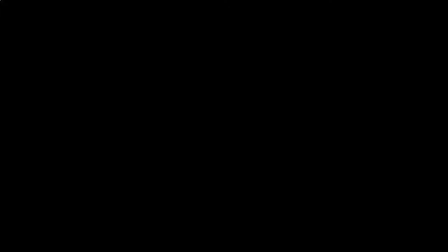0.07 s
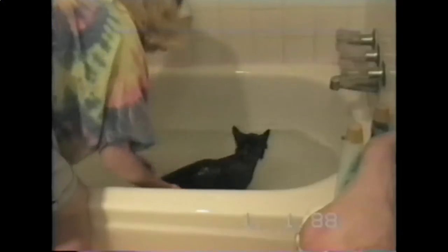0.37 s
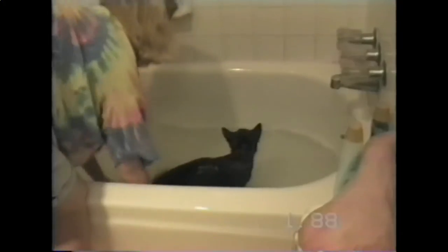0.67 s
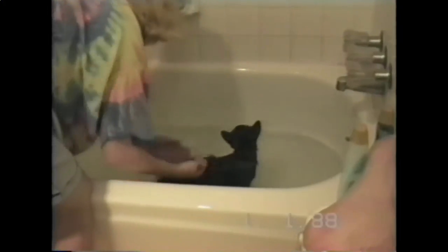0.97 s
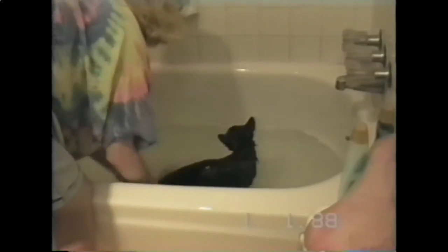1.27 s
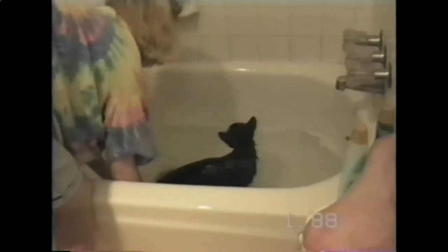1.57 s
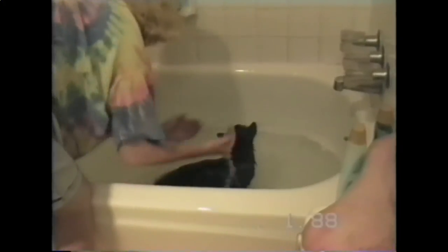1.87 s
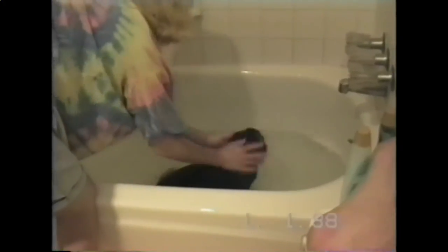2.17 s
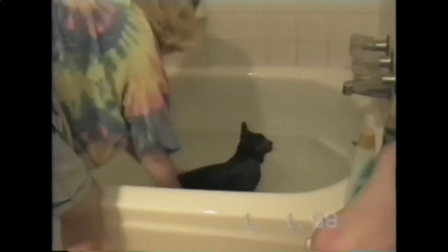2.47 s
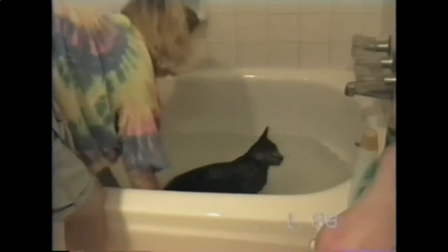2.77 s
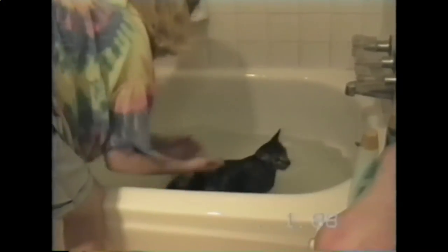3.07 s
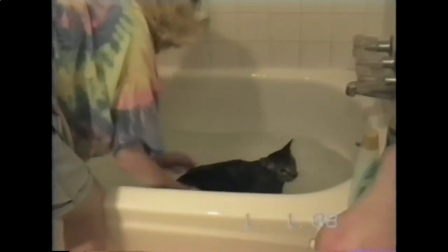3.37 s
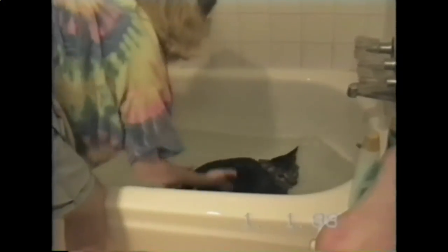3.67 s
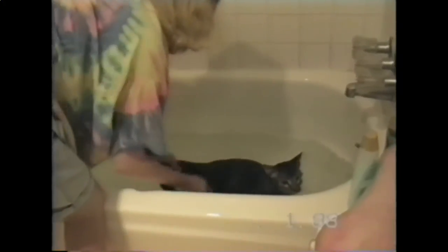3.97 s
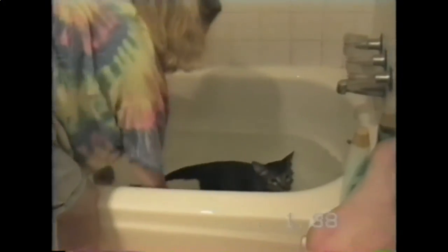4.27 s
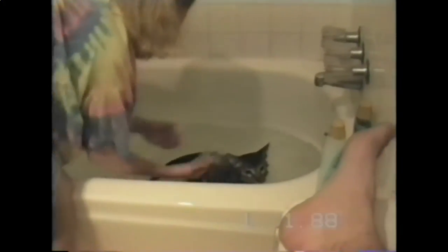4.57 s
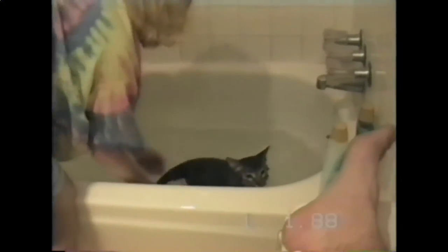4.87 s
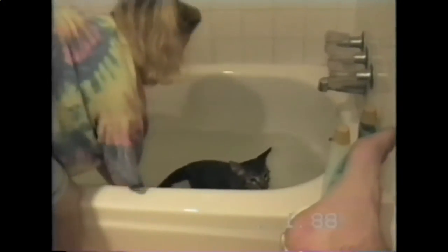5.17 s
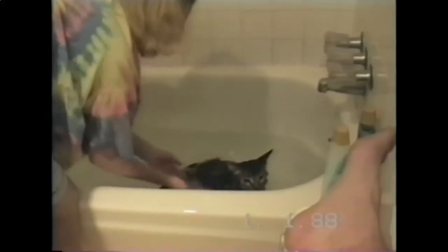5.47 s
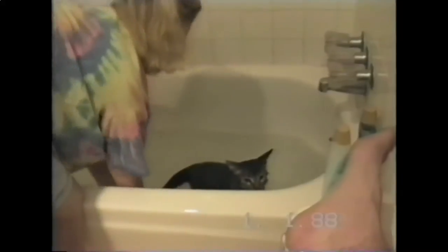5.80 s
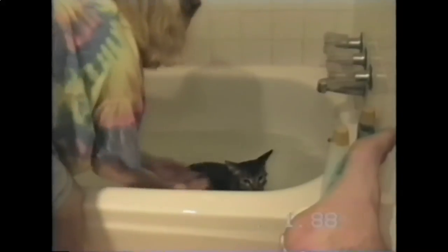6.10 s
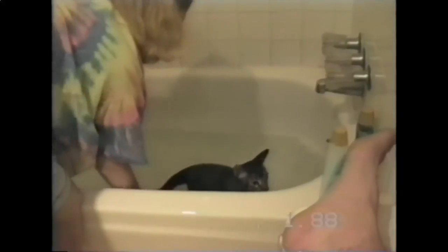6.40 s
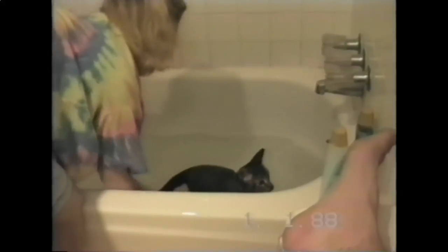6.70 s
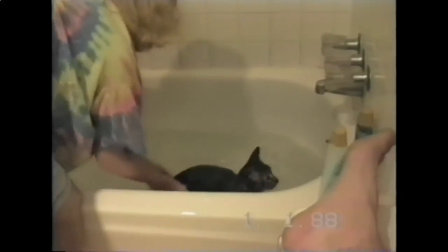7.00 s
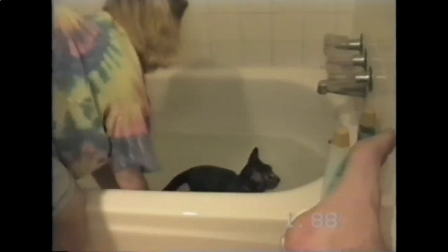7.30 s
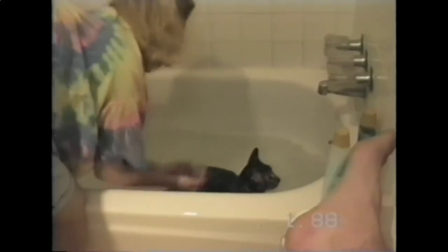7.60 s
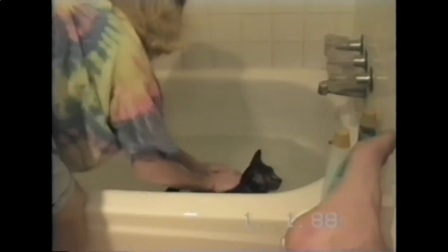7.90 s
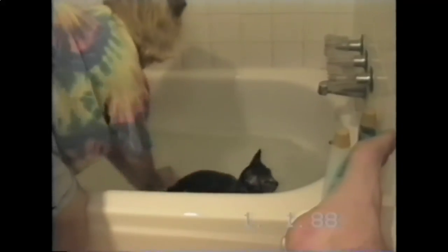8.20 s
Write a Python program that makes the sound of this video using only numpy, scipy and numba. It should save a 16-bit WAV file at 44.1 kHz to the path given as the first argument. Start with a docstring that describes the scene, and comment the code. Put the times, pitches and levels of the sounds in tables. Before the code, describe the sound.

Hands scoop water in a bathtub again and again. Each scoop sloshes with deep gulps, bubbling plops and short gurgles, then the water pours back as spray and bright little slaps. The surges come unevenly from start to finish, with an occasional soft, dull bump against the tub. The small tiled bathroom adds a short ring, and a mono microphone picks up its own faint hum and hiss.

```python
"""A small tiled bathroom: hands scoop bath water over a cat in the tub, again and again.
Each scoop traps big gulping air pockets and a swarm of ringing bubbles, with plops and gurgles on top;
the poured water falls back as spray and bright slaps. Now and then the tub takes a soft bump.
The tub colours the sound and the tiles ring on; a camcorder hears it in mono over its own hum and hiss."""
import sys
import numpy as np
from scipy import signal
from scipy.fft import rfft, irfft
from scipy.io import wavfile
from scipy.ndimage import uniform_filter1d
from numba import njit

SR = 44100
rng = np.random.default_rng(int(sys.argv[2]) if len(sys.argv) > 2 else 0)


def to_wav(s):
    """Save 16-bit WAV."""
    ch = np.atleast_2d(s).T  # columns
    pcm = np.round(np.clip(ch, -1, 1) * 32767)  # PCM
    wavfile.write(sys.argv[1], SR, pcm.astype(np.int16))


N = 363825
TIME = np.arange(N) / SR


def undb(db):
    """Decibels to gain."""
    return 10 ** (np.asarray(db) / 20)


def unit(x):
    """Scale to rms 1."""
    return x / np.sqrt(np.mean(x ** 2))


def gain_at(hz, curve):
    """Read an EQ curve (f/Hz, level/dB) as a gain."""
    f, db = np.transpose(curve)
    return undb(np.interp(np.log(hz + 1e-9), np.log(f), db))


def colour(x, curve):
    """Apply an EQ curve (f/Hz, level/dB)."""
    return irfft(rfft(x) * gain_at(np.fft.rfftfreq(len(x), 1 / SR), curve), len(x))


def low_cut(x, hz, order):
    """Roll off the lows."""
    return signal.sosfilt(signal.butter(order, hz, "high", fs=SR, output="sos"), x)


def resonate(x, hz, width_hz):
    """Two-pole resonance, gain 1 at its centre."""
    return signal.lfilter(*signal.iirpeak(hz, hz / width_hz, fs=SR), x)


def add(track, start_s, sound):
    """Mix a sound into a track."""
    i = int(start_s * SR)
    track[i:i + len(sound)] += sound[:N - i]


@njit
def ring(starts, hz, cycles, gains, rise):
    """Bubbles: sines that fade to 1/e in so many cycles and rise in pitch as they near the surface."""
    out = np.zeros(N)
    for k in range(len(starts)):
        first, life = int(starts[k] * SR), cycles[k] * SR / hz[k]
        gain, fade, phase = gains[k], np.exp(-1 / life), 0.
        for i in range(min(int(6 * life), N - first)):
            phase += 2 * np.pi * hz[k] / SR * (1 + rise[k] * i / (3 * life))
            out[first + i] += gain * np.sin(phase)
            gain *= fade
    return out


def camcorder_noise(hiss_db=-52, hum_db=-63):
    """A steady bed of rumble, hiss and mains hum."""
    # EQ of the rumble and hiss: f/Hz, level/dB
    floor_eq = [(15, -27), (30, 2), (46, -4.5), (80, 2), (150, -2.5), (220, 1), (420, 0), (1200, -18),
                (3000, -12.5), (8000, -17.5), (15000, -20)]
    hiss = colour(rng.standard_normal(N), floor_eq)
    hum = np.sin(2 * np.pi * 60 * TIME)
    return undb(hiss_db) * unit(hiss) + undb(hum_db) * unit(hum)


def surges(starts, lengths, powers, attack_s, sag_db_per_s, release_s, settle_db=-20.5, settle_s=0.45):
    """Power envelope of surges: each swells, sags, drops, and laps on faintly as the water settles."""
    out, t = np.full(N, 1e-9), TIME[:3 * SR // 2]
    body = np.minimum(t / attack_s, 1) * undb(-sag_db_per_s * t)
    for start, length, power in zip(starts, lengths, powers):
        after = np.maximum(t - length, 0)
        lapping = undb(settle_db) * np.exp(-after / settle_s)
        ending = np.maximum(np.exp(-after / release_s), lapping)
        add(out, start, power * (body * ending) ** 2)
    return out


def hand_strokes(gulp_lag_s=0.016):
    """Hands push through the water and trap air: gulp power, churn power and tilt-weighted churn power."""
    # strokes: t/s, length/s, bubble level/dB, gulp level/dB, tilt to small bubbles/(dB per octave)
    strokes = [(0.171, 0.17, -30, -38.5, -0.5), (0.418, 0.065, -33.5, -47, -6),
               (0.578, 0.13, -33.5, -40, 6), (0.753, 0.35, -30.5, -36, 1), (1.156, 0.18, -39, -69, -6),
               (1.417, 0.096, -40.5, -41.5, 2), (1.674, 0.23, -31.5, -34.5, -5.5),
               (1.908, 0.31, -35.5, -60, -4.5), (2.563, 0.14, -37.5, -53, 3), (2.655, 0.2, -40, -43.5, 1),
               (2.931, 0.094, -32.5, -33, -7.5), (3.032, 0.21, -32, -42.5, 1),
               (3.347, 0.092, -37.5, -62, -8), (3.48, 0.082, -34, -39, -2), (3.597, 0.26, -34.5, -59, -7),
               (4.09, 0.45, -46.5, -58, 11), (4.293, 0.069, -33, -31.5, 0), (4.458, 0.18, -31, -33, -2),
               (4.718, 0.22, -41, -42.5, 3), (4.982, 0.1, -32, -34.5, -0.5), (5.108, 0.11, -33.5, -57, 6),
               (5.251, 0.33, -30.5, -42.5, -1.5), (5.681, 0.71, -34.5, -38.5, 1.5),
               (6.025, 0.26, -30.5, -37, -2.5), (6.351, 0.28, -39.5, -39, -7), (6.668, 0.27, -33, -41, -3),
               (7.14, 0.2, -38.5, -47.5, 5), (7.26, 0.16, -39.5, -62, -5.5),
               (7.534, 0.046, -32.5, -35.5, 3), (7.67, 0.17, -38.5, -55, 4), (7.956, 0.37, -33, -67, -1.5)]
    s, length, bubble_db, gulp_db, tilt_db = np.transpose(strokes)
    shape = dict(attack_s=0.013, sag_db_per_s=5, release_s=0.032)
    churn = surges(s, length, undb(bubble_db) ** 2, **shape)
    churn_tilt = surges(s, length, undb(bubble_db) ** 2 * tilt_db, **shape)
    # deep air pockets close only once the hand is under water
    gulps = surges(s + gulp_lag_s, length, undb(gulp_db) ** 2,
                   attack_s=0.024, sag_db_per_s=12, release_s=0.0057)
    return gulps, churn, churn_tilt


def pouring():
    """Water runs off the hands and falls back: the power of its spray, held through each pour."""
    # pours: t/s, length/s, spray level/dB
    pours = [(0.266, 0.1, -37), (0.382, 0.14, -32), (0.566, 0.043, -33), (0.748, 0.081, -38),
             (0.995, 0.21, -41), (1.137, 0.18, -36), (1.384, 0.04, -41.5), (1.442, 0.095, -35.5),
             (1.843, 0.44, -37.5), (2.228, 0.33, -43), (2.674, 0.052, -35), (3.087, 0.21, -35.5),
             (3.326, 0.085, -34.5), (3.367, 0.09, -33), (3.49, 0.056, -61), (4.07, 0.13, -44.5),
             (4.18, 0.103, -39.5), (4.264, 0.2, -45), (4.53, 0.081, -40), (4.646, 0.22, -36.5),
             (4.851, 0.18, -31), (5.306, 0.32, -45), (5.581, 0.16, -33.5), (5.791, 0.053, -33),
             (5.96, 0.37, -41.5), (6.343, 0.21, -34.5), (6.667, 0.25, -42.5), (6.917, 0.27, -41),
             (7.075, 0.048, -32.5), (7.234, 0.052, -33), (7.496, 0.035, -44), (7.55, 0.33, -40.5),
             (7.894, 0.11, -31.5), (8.067, 0.13, -36)]
    s, length, db = np.transpose(pours)
    return surges(s, length, undb(db) ** 2, attack_s=0.033, sag_db_per_s=0, release_s=0.0019)


def swarm(family, tilt_db, count, cycles, rise, spread_db, steady_s):
    """Many faint bubbles and a few loud ones across a family's pitches, tilted per octave; rms near 1."""
    when, pitch, size, damping = rng.random((count, 4)).T
    low_hz, high_hz = family[0][0], family[-1][0]
    hz = low_hz * (high_hz / low_hz) ** pitch
    lives = cycles * 2 ** (2 * damping - 1)
    tilt = np.broadcast_to(tilt_db, N)[(when * N).astype(int)] * np.log2(hz / np.median(hz))
    accent_db = spread_db * np.minimum(-np.log(1 - size), 4)
    gains = gain_at(hz, family) * np.sqrt(hz / lives) * undb(accent_db + tilt)
    sound = ring(when * N / SR, hz, lives, gains, np.full(count, rise))
    sound = low_cut(sound, 0.84 * low_hz, order=6)
    # the bubbles of one moment share the energy that the hand puts in
    span = int(steady_s * SR)
    power = uniform_filter1d(uniform_filter1d(sound ** 2, span), span)
    return sound / np.sqrt(power + 1e-9)


def sloshing():
    """Deep gulps under the hands, bubbles in the churned water, and a spray of droplets."""
    # strength of each bubble family across its pitches: f/Hz, level/dB
    gulp_family = [(275, -26), (325, -6.5), (365, -6.5), (480, 1.5), (680, 3)]
    bubble_family = [(620, -5), (820, 1.5), (1150, 0), (1500, 2), (2200, -0.5), (3400, -11.5)]
    spray_family = [(2400, -5), (3300, -0.5), (4600, -2), (6500, 0), (8500, -2.5), (10300, 3.5),
                    (13500, -7)]
    gulp_power, churn, churn_tilt = hand_strokes()
    fall = pouring()
    raised = fall * undb(-2.5) ** 2  # pours raise some bubbles
    thrown = churn * undb(-11) ** 2  # strokes throw a little spray
    gulp_db, bubble_db, spray_db = 10 * np.log10([gulp_power, churn + raised, fall + thrown])
    bubble_tilt = (churn_tilt + raised * 9) / (churn + raised)  # pours tilt up 9 dB per octave
    # the spray sounds brighter when it outweighs the bubbles, duller when the bubbles are loud
    spray_tilt = 0.27 * (spray_db - bubble_db + 5)
    gulps = swarm(gulp_family, tilt_db=12, count=1500,
                  cycles=4.7, rise=0.213, spread_db=4.5, steady_s=0.028)
    bubbles = swarm(bubble_family, tilt_db=bubble_tilt, count=6000,
                    cycles=6.92, rise=0.2345, spread_db=4.5, steady_s=0.064)
    spray = swarm(spray_family, tilt_db=spray_tilt, count=36000,
                  cycles=5.3, rise=0.05, spread_db=4, steady_s=0.099)
    return gulps * undb(gulp_db) + bubbles * undb(bubble_db - 1.5) + spray * undb(spray_db)


def plops(trim_db=4, shard_db=-12, shard_lag_s=0.03, shard_octaves=0.42):
    """Large air pockets pinch off and ring, gliding up through their pitch; each sheds three shards."""
    # single large bubbles: t/s, f/Hz, level/dB, rise/share of pitch, decay/cycles
    pockets = [(0.315, 1063, -24.5, 0.11, 8.1), (0.331, 423, -27, .12, 6), (0.405, 3060, -22.5, 0.25, 16),
               (0.64, 1382, -26, 0.13, 17), (0.815, 730, -24, .1, 4.8), (0.85, 1010, -20, 0.069, 4.8),
               (0.892, 925, -21, 0.28, 4.2), (0.94, 716, -29.5, .1, 7), (1.0, 432, -31, 0.091, 2.9),
               (1.037, 1175, -25, 0.14, 8.4), (1.063, 1880, -22.5, 0.23, 13), (1.2, 2870, -24.5, 0.11, 6.5),
               (1.46, 2740, -24.5, 0.24, 7.9), (1.652, 2970, -26, 0.19, 5.3), (1.672, 913, -29, 0.19, 9.9),
               (1.724, 412, -22.5, 0.26, 8.5), (1.7, 755, -24, .1, 7.1), (1.728, 810, -18.5, 0.1, 10),
               (1.857, 550, -11.5, 0.29, 1.4), (1.874, 890, -25, 0.12, 5.3),
               (2.109, 774, -20.5, 0.05, 12.5), (2.21, 3780, -25, 0.05, 14),
               (2.35, 2550, -26.5, 0.091, 8.7), (2.401, 5300, -31.5, .04, 30),
               (2.458, 1800, -32, 0.07, 9.7), (2.613, 1165, -35, .08, 9), (2.657, 1140, -27, 0.1, 8.7),
               (2.755, 587, -26, 0.19, 10.3), (2.79, 660, -29.5, 0.075, 8), (2.933, 1250, -26, 0.2, 5.7),
               (2.964, 900, -15.5, 0.39, 4.3), (3.002, 1260, -29, 0.18, 3.1), (3.215, 356, -28.5, .1, 3.5),
               (3.272, 1070, -15.5, 0.14, 3.8), (3.354, 2740, -29, 0.1, 17), (3.503, 390, -18.5, .11, 1.8),
               (3.638, 1170, -16.5, 0.12, 3), (3.664, 1117, -16.5, 0.13, 8.7),
               (4.208, 721, -28, 0.034, 8.2), (4.237, 711, -35, .04, 18), (4.489, 1090, -17.5, 0.66, 5.4),
               (5.168, 1148, -25, 0.92, 16), (5.277, 525, -19.5, 0.31, 5.8), (5.296, 865, -22.5, 0.085, 16),
               (5.337, 1093, -26, 0.039, 23), (5.467, 678, -25, 0.15, 8.7), (5.497, 1128, -21, 0.15, 6.7),
               (5.512, 613, -21.5, 0.184, 12), (5.588, 668, -22.5, .1, 7), (5.831, 427, -16.5, 0.067, 2.4),
               (6.03, 496, -19.5, 0.13, 4.6), (6.073, 492, -22.5, 0.12, 3.5),
               (6.084, 1280, -23.5, 0.1, 6.4), (6.113, 873, -19, 0.087, 6.8), (6.114, 338, -19, 0.12, 4.5),
               (6.207, 472, -29, .12, 3.1), (6.235, 894, -28, 0.06, 19), (6.238, 1190, -33, 0.087, 7.5),
               (6.703, 2970, -25.5, 0.071, 27), (6.817, 996, -22.5, 0.092, 8.9),
               (7.089, 1200, -17.5, 0.33, 1.5), (7.122, 1790, -22, 0.12, 11), (7.176, 1790, -30, .08, 14),
               (7.211, 1820, -29, 0.088, 13), (7.327, 699, -28, 0.11, 22), (7.341, 972, -21.5, 0.52, 10.5),
               (7.398, 2330, -34, .04, 32), (7.497, 3300, -34, 0.12, 16), (7.603, 1062, -22.5, 0.16, 7.6),
               (7.711, 896, -25, 0.19, 9), (7.962, 1100, -22.5, 0.96, 6), (8.072, 1139, -26, 0.13, 20)]
    s, hz, db, rise, cycles = np.transpose(pockets)
    sound = ring(s, hz / (1 + rise / 5), cycles, undb(db + trim_db), rise)
    for lag, detune in rng.random((len(s), 2, 3)).T:
        shard_hz = hz * 2 ** (shard_octaves * (2 * detune - 1))
        sound += ring(s + shard_lag_s * lag, shard_hz, cycles / 2, undb(db + trim_db + shard_db), rise)
    return low_cut(sound, hz=335, order=6)


def slaps(decay_s=0.0084, trim_db=1):
    """Falling water hits the surface with a short bright crack, broad for a sheet, narrow for a drop."""
    # sheets and fat drops landing: t/s, level/dB, centre f/Hz, bandwidth/share of centre
    hits = [(0.605, -29, 7400, .28), (1.003, -30.5, 7200, 0.42), (1.1866, -27, 4230, 0.42),
            (1.205, -25, 6000, .35), (1.295, -33, 4630, 0.16), (1.497, -29.5, 1400, 0.26),
            (1.501, -31.5, 6530, 0.25), (1.89, -32, 4170, .4), (2.09, -23, 4900, 0.36),
            (2.21, -32, 3630, 0.22), (2.362, -31, 5600, 0.27), (2.689, -29, 2550, 0.55),
            (2.7092, -29, 7300, 0.39), (2.949, -47, 3500, 0.16), (3.339, -30, 6840, 0.36),
            (3.5047, -19.5, 7070, 0.17), (3.6371, -28, 1330, 0.21), (4.21, -31, 2600, 0.69),
            (4.2907, -20.5, 6760, 0.61), (4.325, -22, 7240, 0.19), (4.326, -26, 1400, .28),
            (4.887, -29, 2800, .8), (5.3348, -31, 1770, 0.34), (5.335, -27.5, 9600, 0.16),
            (5.64, -34, 6000, 0.24), (5.706, -39, 5100, .28), (5.8314, -31, 1890, 0.17),
            (6.4616, -30, 5500, .28), (6.5281, -26, 5500, 0.69), (6.935, -31, 4400, 0.25),
            (7.09, -21.5, 6500, 1.3), (7.588, -29.5, 2840, .28), (7.773, -23.5, 10800, 0.13),
            (7.907, -26, 3400, 0.25), (7.951, -29.5, 4500, .28)]
    out, t = np.zeros(N), TIME[:SR // 16]
    for s, db, hz, width_share in hits:
        width_hz = min(width_share * hz, SR / 4)
        crack = unit(resonate(rng.standard_normal(len(t)), hz, width_hz))
        add(out, s, crack * np.exp(-t / decay_s) * undb(db + trim_db))
    return out


def plunges(rise=0.12, scatter_db=4, fade_db=13.5, count=24):
    """A hand or a lump of water breaks the surface and traps a sudden, fading cloud of bubbles."""
    # bubble clouds: t/s, length/s, lowest f/Hz, highest f/Hz, opening bubble level/dB, decay/cycles
    clouds = [(0.636, .016, 1340, 2900, -22.5, 7.9), (0.847, .014, 756, 1700, -26, 4),
              (2.349, 0.02, 2300, 2930, -32.5, 7), (2.948, .04, 1050, 4140, -22.5, 5),
              (4.474, 0.064, 1150, 4200, -24, 5.8), (6.699, 0.063, 2780, 3250, -23.5, 12),
              (7.115, 0.041, 1550, 1940, -27, 9.7)]
    out, each = np.zeros(N), np.ones(count)
    for s, length, low_hz, high_hz, db, cycles in clouds:
        when, pitch, strength = rng.random((3, count))
        along = (np.arange(count) + when) / count
        shuffled = (np.argsort(pitch) + pitch) / count  # covers the range in random order
        hz = low_hz * (high_hz / low_hz) ** shuffled
        gains = undb(db - fade_db * along + scatter_db * (2 * strength - 1))
        out += ring(s + length * along, hz / (1 + rise / 5), cycles * each, gains, rise * each)
    return low_cut(out, hz=600, order=4)


def gurgles(gap_s=0.011, cycles=8, rise=0.11, fade_db=10.5, trim_db=-3,
            scatter_octaves=0.12, scatter_db=1.5, max_count=20):
    """A cavity behind the hand breaks into an uneven chain of bubbles; pitch slides as its size changes."""
    # bubble chains: t/s, length/s, first f/Hz, last f/Hz, opening level/dB
    chains = [(0.66, 0.069, 2200, 1590, -19), (0.801, 0.035, 883, 1040, -17),
              (0.867, 0.048, 2380, 2320, -17.5), (1.005, 0.052, 1130, 1330, -19),
              (1.71, 0.049, 910, 794, -20), (1.802, 0.047, 1054, 940, -22),
              (2.487, 0.088, 1800, 1510, -28.5), (2.57, 0.032, 1210, 1060, -35),
              (2.947, 0.093, 1190, 920, -17), (3.294, 0.044, 1153, 1296, -17),
              (3.68, 0.057, 1054, 1160, -19), (4.482, 0.045, 1240, 1290, -23.5),
              (5.229, 0.047, 2210, 2450, -19), (5.36, 0.072, 1395, 1830, -19),
              (5.508, 0.078, 1205, 1100, -20), (6.727, 0.03, 2950, 2740, -25),
              (6.775, 0.057, 1250, 1010, -18.5), (7.119, .04, 1610, 1830, -22),
              (7.247, 0.03, 1870, 1760, -21), (7.35, 0.053, 955, 1370, -21)]
    out = np.zeros(N)
    for s, length, first_hz, last_hz, db in chains:
        jitter, detune, softness = rng.uniform(-1, 1, (3, max_count))
        along = np.maximum(np.arange(max_count) + jitter / 2, 0) * gap_s / length
        hz = first_hz * (last_hz / first_hz) ** along * 2 ** (scatter_octaves * detune)
        gains = undb(db + trim_db - fade_db * along - scatter_db * softness)
        live = along < 1
        each = np.ones(live.sum())
        out += ring(s + length * along[live], hz[live], cycles * each, gains[live], rise * each)
    return low_cut(out, hz=500, order=4)


def bumps(cycles=2.04):
    """The water-filled tub answers a bump with a dull, quickly damped thud."""
    # soft bumps against the tub: t/s, f/Hz, level/dB
    thuds = [(0.809, 204, -37.5), (0.942, 146, -36), (1.392, 258, -40), (1.821, 143, -38), (4.24, 230, -38),
             (5.819, 174, -37), (4.607, 145, -38)]
    s, hz, db = np.transpose(thuds)
    return ring(s, hz, np.full(len(s), cycles), undb(db), rise=np.zeros(len(s)))


def bathroom(x, direct_db, tail_db, predelay_s=0.0014, low_t60_s=0.56, high_t60_s=0.42):
    """The tub's hollow rings, then dense echoes from the tiles, the treble dying first."""
    # air resonances of the tub: f/Hz, width/Hz, level/dB
    tub_modes = [(361, 25, 0), (483, 18, -2.5), (558, 6.8, -19.5), (645, 11, -3), (1242, 185, -9)]
    x = x + sum(undb(db) * resonate(x, hz, width) for hz, width, db in tub_modes)
    t, hop = TIME[:SR // 2], SR // 32
    low_fade, high_fade = undb(-60 * t / low_t60_s), undb(-60 * t / high_t60_s)
    noise = rng.standard_normal(2 * N)
    low = signal.sosfiltfilt(signal.butter(2, 3000, fs=SR, output="sos"), noise)
    high = noise - low
    window, echoes = signal.windows.cosine(2 * hop), np.zeros(N)
    # the splashes move about the tub, so each moment has its own pattern of echoes
    for i in range(0, N, hop):
        pattern = rng.integers(N) + np.arange(len(t))
        tail = (low[pattern] * low_fade + high[pattern] * high_fade) * (t > predelay_s)
        tail /= np.sqrt(np.sum(tail ** 2))
        moment = x[i:i + 2 * hop] * window[:N - i]
        add(echoes, i / SR, signal.fftconvolve(moment, tail))
    return undb(direct_db) * x + undb(tail_db) * echoes


def scene():
    """The mono mix; big bubbles at the open surface reach the microphone with less of the room."""
    wash = bathroom(sloshing() + slaps() + bumps(), direct_db=-5, tail_db=-2.03)
    glugs = bathroom(plops() + gurgles() + plunges(), direct_db=-5, tail_db=-4.5)
    mono = wash + glugs + camcorder_noise()
    return np.array([mono, mono])


def record(dry, start_s=0.242, top_hz=14500):
    """The camcorder cuts in after a moment, colours the sound and dulls the top."""
    # microphone colour: f/Hz, level/dB
    mic_eq = [(40, 3.5), (200, -1.5), (400, -3), (1200, 3.5), (4000, 4), (8500, 1), (10400, -9.5),
              (12200, -5.5), (14500, -15.5)]
    sound = np.array([colour(channel, mic_eq) for channel in dry]) * (TIME >= start_s)
    return signal.sosfilt(signal.ellip(8, 0.2, 70, top_hz, fs=SR, output="sos"), sound)


dry = scene()
out = record(dry)
to_wav(out)
```